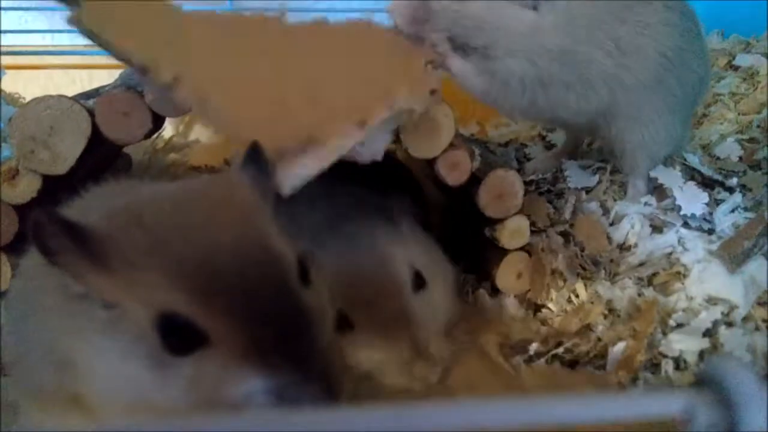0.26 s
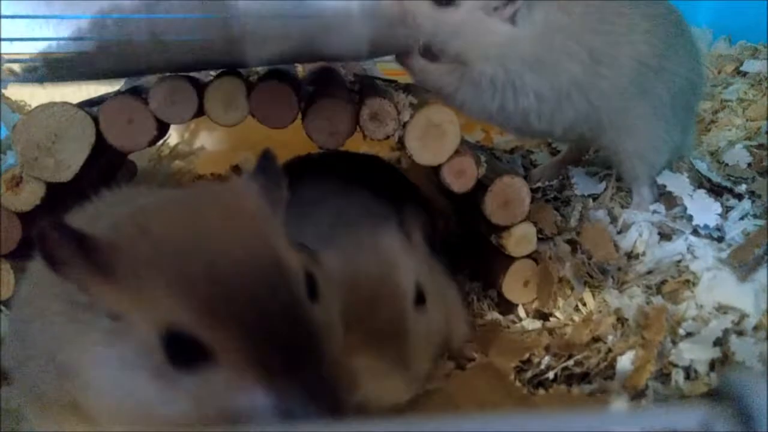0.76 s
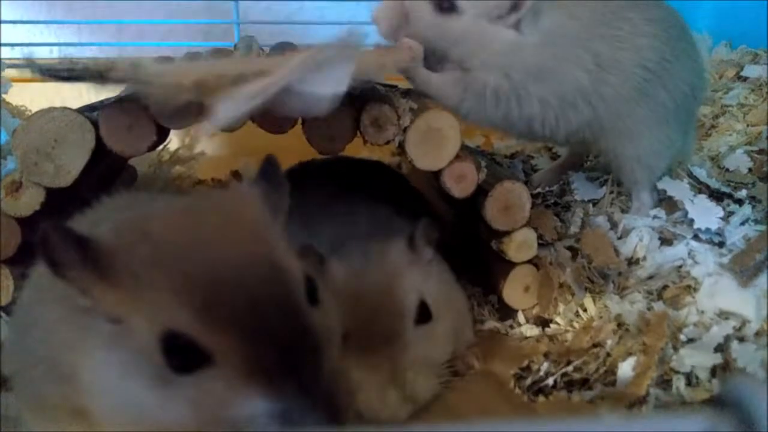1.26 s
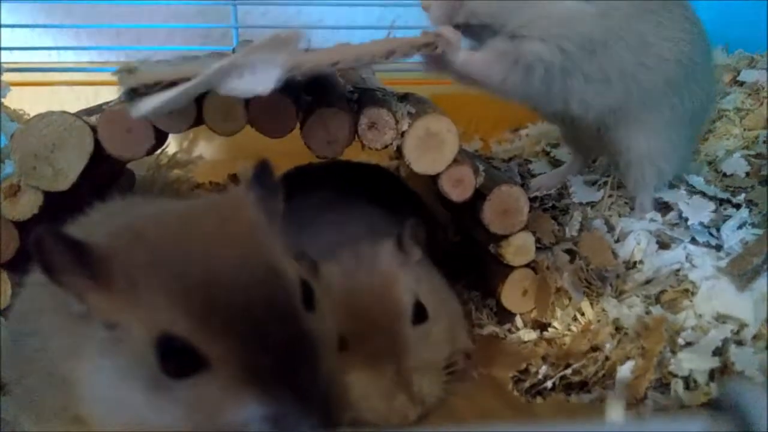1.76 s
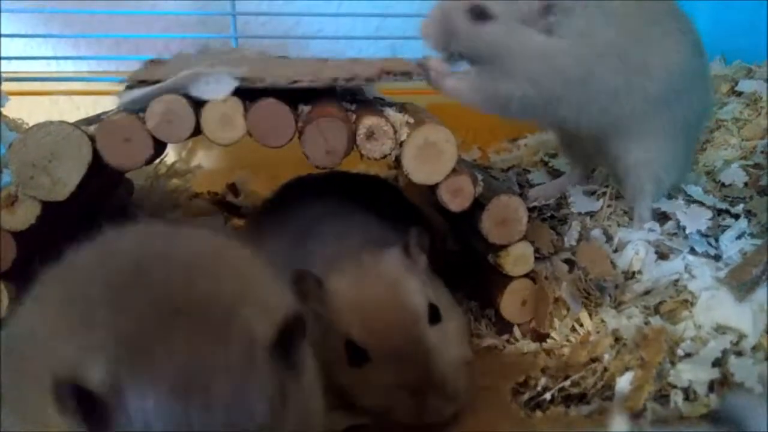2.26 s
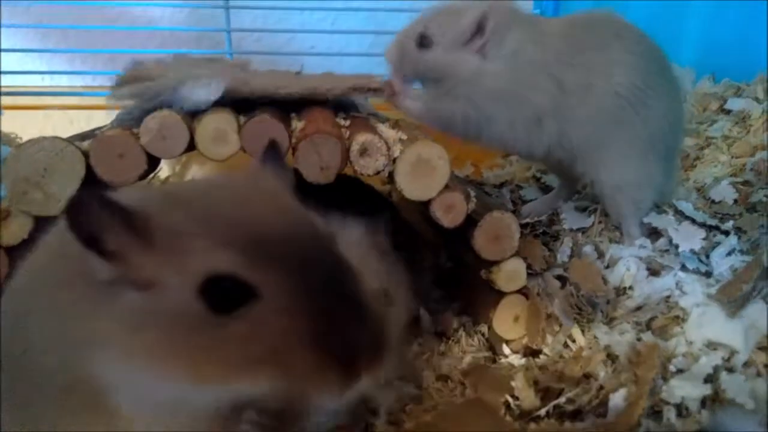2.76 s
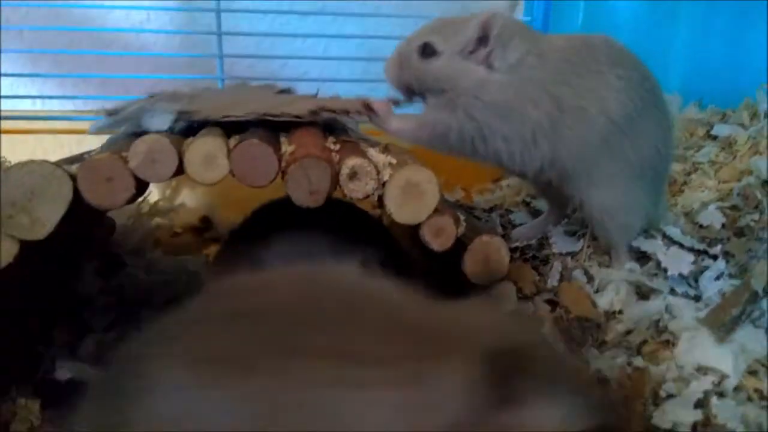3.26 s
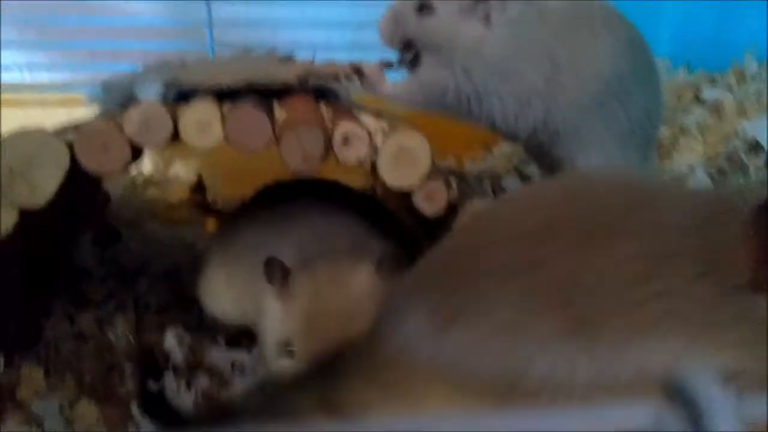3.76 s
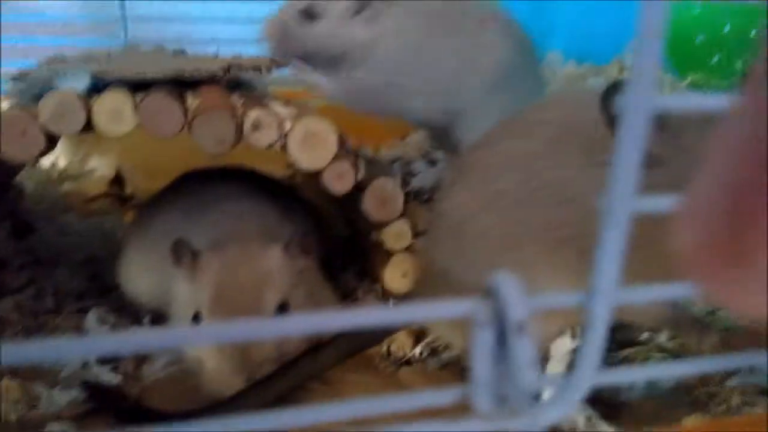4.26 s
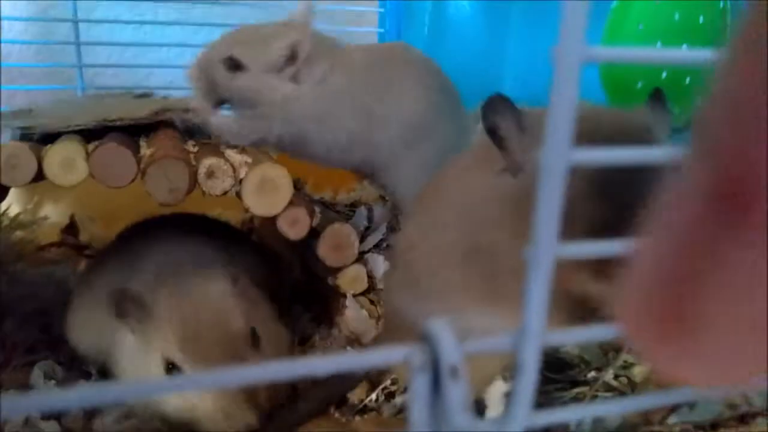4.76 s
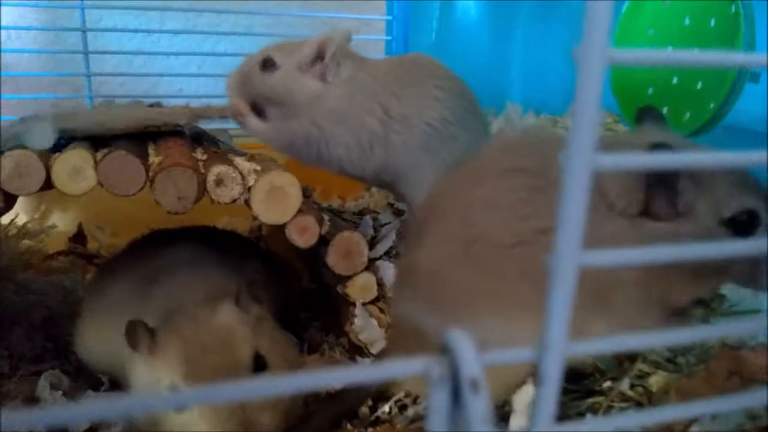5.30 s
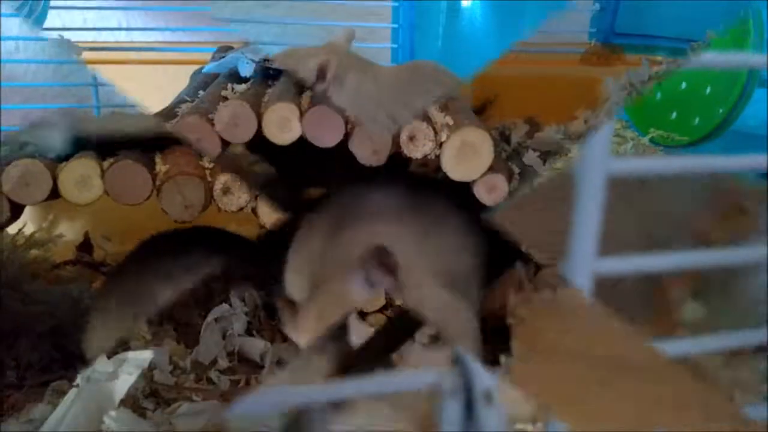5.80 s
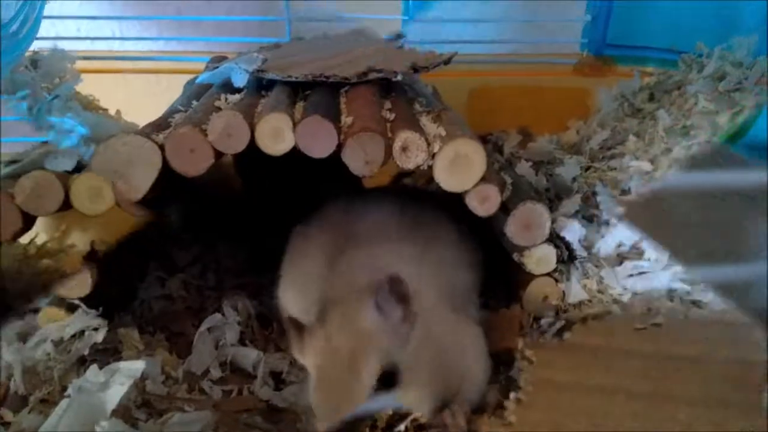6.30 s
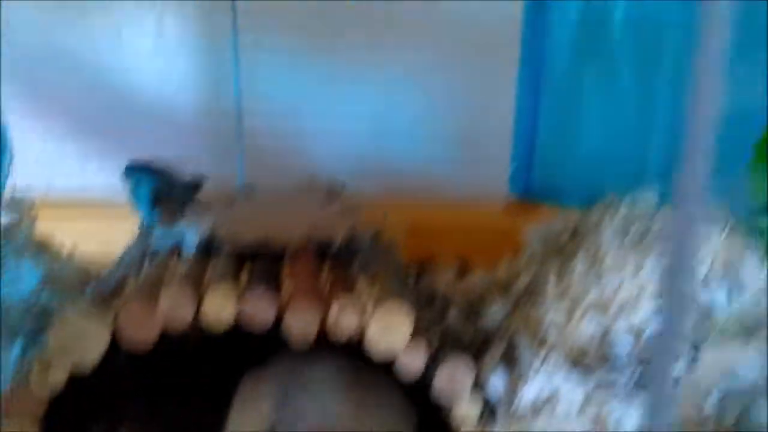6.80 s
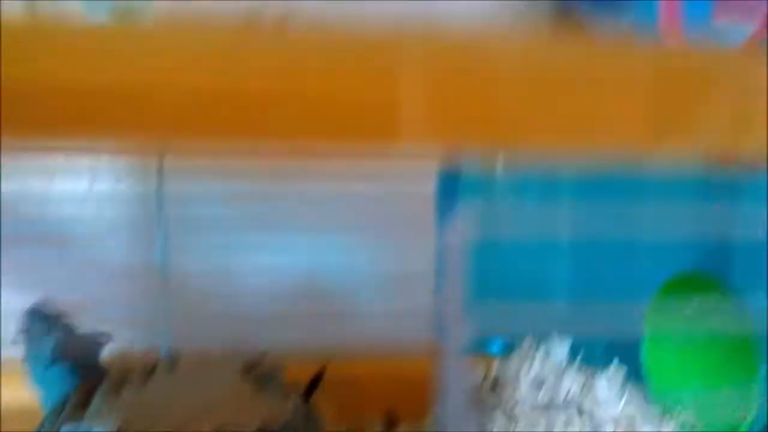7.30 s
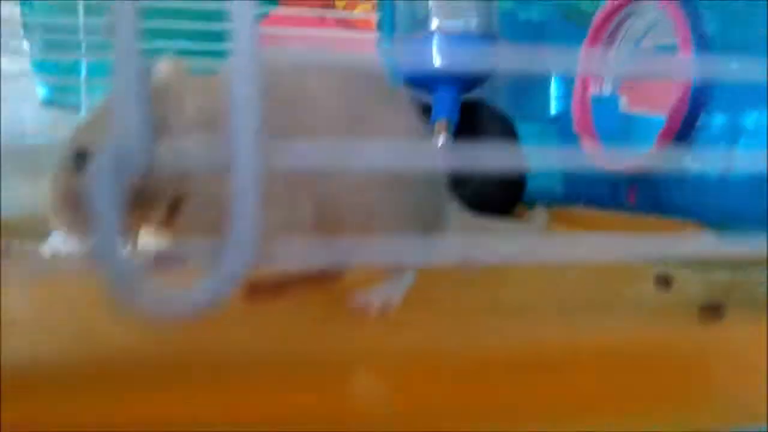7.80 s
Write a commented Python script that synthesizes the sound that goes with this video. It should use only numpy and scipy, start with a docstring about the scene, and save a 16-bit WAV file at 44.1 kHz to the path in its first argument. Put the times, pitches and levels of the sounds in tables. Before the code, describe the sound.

Close, dry stereo sound of small rodents tearing paper and card. Quick tooth snaps and fibrous crackles come in uneven bursts, with dull board scrapes and tiny hollow wooden knocks beneath. A cluster of loud cracks mid-way gives way to sparser nibbling, then the heaviest bites arrive late and stop, leaving faint hiss and low hum.

```python
"""Gerbils shred cardboard and paper in a small cage, heard close by at two microphones.
Teeth bite in short bursts of snaps; fibres crackle in clumps as strips tear and bedding stirs.
Random clicks, shaped in level and filtered, give both a bright crackle and a duller board sound.
Board knocks and crunches ring a wooden arch, summed from decaying sines; one low bump joins them.
Filtered noise hiss, a wavering low hum and thin steady whine tones run beneath."""
import sys
import numpy as np
from scipy import signal
from scipy.io import wavfile
from scipy.ndimage import uniform_filter1d, minimum_filter1d

SR = 44100
rng = np.random.default_rng(int(sys.argv[2]) if len(sys.argv) > 2 else 0)


def dump(signal):
    """Clip the signal to [-1, 1] and save it as 16-bit WAV at the path in sys.argv[1]."""
    limited = np.clip(np.atleast_2d(signal).T, -1, 1)
    pcm = np.round(limited * 32767).astype(np.int16)
    wavfile.write(sys.argv[1], SR, pcm)


N = 355005

# Levels are nominal, ahead of the mix gains in scene().
# teeth breaking through: t of break/s, crackle level/dB, board re crackle/dB
BITES = [(0.098, -19, -23), (0.276, -33, -32), (0.308, -17, -13.5), (0.764, -29.5, -36), (0.882, -24, -32),
         (1.0145, -22.5, -40), (1.097, -32, -38), (1.1681, -17.5, -17), (1.237, -29, -32),
         (1.2948, -19.5, -24), (1.435, -35, -23), (1.454, -19.5, -37), (1.663, -19.5, -12.5),
         (1.7979, -19.5, -19), (1.8254, -21.5, -18), (1.9389, -27.5, -18), (2.1256, -13.5, -14.5),
         (2.3591, -21, -21.5), (2.495, -30, -21), (2.5411, -12, -3), (2.555, -8, -23.5), (2.728, -15, -15),
         (2.797, -28, -20), (2.879, -32.5, -9), (3.0056, -29.5, -13), (3.1946, -23, -34),
         (3.223, -33.5, -34), (3.305, -29, -25), (3.453, -34, -26), (3.621, -29.5, -7),
         (3.9484, -29.5, -43), (4.0724, -16, -11), (4.1081, -15, -12), (4.2918, -34, 1.5),
         (4.501, -26, -13), (4.5349, -20, -16), (4.845, -21, -45), (4.9336, -19, -16.5),
         (5.1443, -20.5, -10.5), (5.374, -30, -29), (5.41, -26, -13.5), (5.4586, -20, -20),
         (5.498, -22.5, -16), (5.557, -26.5, -11.5), (5.592, -21, -16), (5.6442, -16.5, -8),
         (5.718, -22, -22), (5.8396, -6, -9.5), (5.918, -10.5, -18.5), (6.1255, -19.5, -9.5),
         (6.2983, -11.5, -5), (6.5157, -17, -20), (6.549, -15, -27), (6.5641, -16.5, -32),
         (6.7586, -13, -21.5), (6.9025, -13.5, -14.5)]
# strips torn off: t/s, length/s, crackle level at start/dB, change along strip/dB, board re crackle/dB
TEARS = [(0.029, 0.074, -53.5, 21.5, -11), (0.086, 0.1, -24.5, -17.5, -22.5), (0.231, 0.021, -34, -15, -8),
         (0.277, 0.069, -24.5, -8.5, -19.5), (0.516, 0.096, -37, 1.5, -10), (0.646, 0.026, -48, 4, -7),
         (0.89, 0.034, -35.5, -12, -20.5), (0.943, 0.21, -33, -13.5, -16.5),
         (1.164, 0.1, -26.5, -23, -13.5), (1.322, 0.073, -37.5, -5.5, -12.5),
         (1.434, 0.034, -42, 6.5, -10.5), (1.565, 0.098, -37.5, -1.5, -10), (1.798, 0.092, -37.5, -8, -16),
         (2.079, 0.04, -36.5, -17, -21), (2.112, 0.1, -32.5, 0, -13.5), (2.321, 0.035, -47.5, 21, -15.5),
         (2.668, 0.024, -38.5, 12.5, -15), (2.729, 0.074, -27.5, -13, -11.5),
         (3.006, 0.037, -37, -14.5, -17.5), (3.161, 0.094, -39.5, -7.5, -19.5), (3.43, 0.3, -48, 3, -9.5),
         (3.568, 0.13, -42, 12, -19), (4.043, 0.1, -42, 8, -11.5), (4.132, 0.095, -47.5, -1.5, -5.5),
         (4.431, 0.086, -52, -4.5, -8), (4.495, 0.22, -37.5, -12, -7), (4.59, 0.087, -33.5, 7, -11.5),
         (4.739, 0.05, -44.5, 1, -0.5), (4.876, 0.091, -40, -4.5, -5.5), (4.967, 0.035, -32, 3.5, -14),
         (5.102, 0.095, -44.5, 4.5, -9.5), (5.24, 0.055, -48.5, 25.5, -13), (5.357, 0.15, -52, 14, -4.5),
         (5.453, 0.023, -29, -0.5, -15.5), (5.674, 0.059, -44, 11.5, -24), (5.775, 0.073, -46.5, 23, -7.5),
         (5.833, 0.19, -24, -21, -14), (6.058, 0.051, -36.5, 8.5, -13), (6.273, 0.065, -32, 3, -11),
         (6.459, 0.12, -44.5, 14.5, -11), (6.619, 0.029, -29.5, -2.5, -21),
         (6.716, 0.082, -28, -11.5, -11.5), (6.818, 0.08, -48.5, 25.5, -7.5), (6.879, 0.077, -33, -3.5, -3),
         (6.982, 0.21, -44, -2.5, -22.5)]
# bedding rustling under the animals: t/s, crackle level/dB
BEDDING_RUSTLE = [(0.0, -63), (0.3, -43.5), (0.72, -56.5), (1.53, -54.5), (1.75, -45.5), (2.04, -55.5),
                  (2.6, -44.5), (2.95, -54.5), (3.1, -66), (3.35, -52.5), (3.8, -45.5), (4.2, -51),
                  (4.37, -70.5), (4.8, -43.5), (6.2, -45.5), (6.93, -40.5), (7.02, -57), (7.24, -63.5),
                  (7.34, -92)]
# spectrum of snapping fibres: f/Hz, relative density/dB per Hz
CRACKLE_SPECTRUM = [(3000, -39.5), (5500, -24), (6500, -22.5), (8000, -14), (11000, -9), (12500, -5.5),
                    (14600, -2.5), (15500, -1.5), (15900, -39.5), (16700, -34)]
# spectrum of the board: f/Hz, relative density/dB per Hz
BOARD_SPECTRUM = [(60, -71), (150, -23), (370, -9), (650, -8.5), (1100, -4), (1800, -6.5), (3000, -6.5),
                  (5000, -14), (7000, -10), (10000, -47)]
# board knocking on wood: t/s, blow level/dB, nominal board pitch f/Hz, rattle length/s
KNOCKS = [(0.527, -43, 547, 0.021), (0.593, -37.5, 350, 0.035), (0.664, -39, 360, 0.044),
          (0.801, -41.5, 355, 0.043), (0.936, -41, 360, 0.062), (1.165, -37.5, 460, 0.021),
          (1.235, -43.5, 378, 0.01), (1.250, -40.5, 388, 0.031), (1.341, -37, 350, 0.014),
          (1.366, -39.5, 370, 0.014), (1.388, -42, 370, 0.01), (1.404, -46, 360, 0.0083),
          (1.415, -42.5, 347, 0.03), (1.463, -40, 382, 0.0072), (1.473, -40.5, 405, 0.022),
          (1.661, -40, 396, 0.025), (1.896, -31, 390, 0.037), (2.542, -33.5, 462, 0.032),
          (2.727, -28, 355, 0.014), (2.879, -43, 410, 0.03), (3.269, -42.5, 246, 0.046),
          (3.833, -41, 254, 0.034), (4.068, -49, 270, 0.035), (4.292, -42, 490, 0.032),
          (4.612, -50, 376, 0.0216), (4.747, -46, 393, 0.016), (4.776, -46, 390, 0.052),
          (4.879, -46, 460, 0.023), (5.192, -43.5, 378, 0.02), (5.366, -44.5, 476, 0.011),
          (5.641, -38, 556, 0.015), (5.839, -36.5, 375, 0.023), (5.915, -35.5, 392, 0.026),
          (6.294, -42, 487, 0.024), (6.558, -40, 402, 0.05), (6.723, -43, 464, 0.041),
          (6.891, -37, 517, 0.033), (7.12, -62, 400, 0.044)]
# teeth crunching through to the wood: t/s, level/dB
CRUNCHES = [(0.296, -35.5), (0.529, -32), (0.595, -32), (1.798, -39), (2.126, -32), (2.354, -41.5),
            (2.542, -24.5), (2.554, -23), (2.727, -17.5), (2.734, -22), (3.635, -31), (4.072, -32),
            (4.106, -29), (4.523, -36), (4.552, -36), (4.636, -34), (4.649, -34.5), (4.75, -37),
            (4.934, -36), (5.142, -48), (5.296, -27.5), (5.458, -42), (5.643, -14.5), (5.786, -42),
            (5.838, -22.5), (5.916, -27), (6.093, -34.5), (6.279, -31), (6.298, -26), (6.512, -33.5),
            (6.878, -28.5), (6.901, -26.5)]
# nominal modes of the wooden arch: f/Hz, level/dB, t60/s
ARCH_MODES = [(740, -8, 0.013), (1100, -3, 0.013), (1550, -5, 0.009), (2250, -5, 0.007)]
# one low bump through the cage floor: t/s, level/dB, f/Hz, length/s
FLOOR_BUMP = (5.85, -55, 96, .075)
# where the busiest animal is: t/s, left re right level/dB
PLACE = [(0, -3.5), (1, 1), (2.2, -0.5), (3.2, 1.5), (3.7, -1.5), (4.7, 3.5), (6.2, -1.5), (7.2, -0.5)]
# whine tones: multiple of WHINE_BASE_HZ, rms level/dB
WHINE_TONES = [(4, -100), (5, -101), (6, -99.5)]
# spectrum of the hiss: f/Hz, relative density/dB per Hz
HISS_SPECTRUM = [(20, -6), (65, 0), (130, -9), (280, -14), (500, -26), (1000, -29), (13500, -31),
                 (14500, -20), (15200, -32), (15800, -50)]

BITE_T60_S, RISE_T60_S = 0.016, 0.0072  # decay after the break, rise before it
BREAK_DB, BREAK_T60_S = 3, 0.0035  # sharp crack at the break, re burst
GRIP_DB_PER_S, LET_GO_DB_PER_S = 1508, 796  # onset and stop of a tear
RUSTLE_BOARD_DB = -15  # re crackle
KNOCK_ARCH_DB = -8.5  # arch ring in a knock
THUD_T60_S, RISE_S = 0.015, 0.0012
LEFT_LAG_SAMPLES = 9  # about the mean; the animals are nearer the right microphone
HUM_HZ, HUM_DB = 99, -73.5  # centre of the wavering
WHINE_BASE_HZ, HISS_DB = 2305, -82
BAND_EDGE_HZ = 16800


def bites():
    """Each bite is a burst of snaps that rises quickly to its break, then dies."""
    lead, length = 400, 5000  # samples before the break, samples in all
    t = (np.arange(length) - lead) / SR
    flutter = gain_of(2.5 * drift(0.001))  # random, roughens each burst
    fibres = flutter * np.array([snaps(13000, spread_db=-1.0), snaps(6000, spread_db=3.5)])
    rise_and_decay = gain_of(-60 * np.where(t < 0, -t / RISE_T60_S, t / BITE_T60_S))
    crack = gain_of(-60 * abs(t) / BREAK_T60_S)
    shape = rise_and_decay / gain_of(BREAK_DB) + crack
    out = np.zeros((2, N))  # crackle drive, board drive
    for s, db, board_db in BITES:
        at = round(s * SR) - lead
        burst = shape * fibres[:, at:at + length]
        # jaw force sets the energy, whatever the random snaps
        burst *= np.linalg.norm(shape) / np.linalg.norm(burst, axis=1, keepdims=True)
        out[:, at:at + length] += burst * gain_of([[db], [db + board_db]])
    return out


def tearing():
    """Fibres snap in clumps as strips tear or bedding stirs; returns crackle and board drives."""
    t = np.arange(0, N + 32, 32) / SR
    power = gain_of(2 * np.interp(t, *np.transpose(BEDDING_RUSTLE)))
    board_power = power * gain_of(2 * RUSTLE_BOARD_DB)
    for s, length, db, change_db, board_db in TEARS:
        along = change_db * np.clip((t - s) / length, 0, 1)
        onset = GRIP_DB_PER_S * np.minimum(t - s, 0)
        stop = -LET_GO_DB_PER_S * np.maximum(t - s - length, 0)
        strip = gain_of(2 * (db + along + onset + stop))
        power = power + strip
        board_power = board_power + strip * gain_of(2 * board_db)
    time = np.arange(N) / SR
    level = np.sqrt(np.interp(time, t, power))
    board_level = np.sqrt(np.interp(time, t, board_power))

    clumps = evened(gain_of(2.2 * drift(0.002) + 2.4 * drift(0.006)))
    # sparse larger ticks at random among the crackle
    ticks = uniform_filter1d(abs(snaps(60, spread_db=2.5)), size=60) * np.sqrt(60)
    clumps = clumps + gain_of(-7) * ticks
    crackle = clumps * level * snaps(5000, spread_db=0.0)
    board = clumps * board_level * snaps(700, spread_db=2.0) * gain_of(1.6 * drift(0.0053))
    return crackle, board


def snaps(per_s, spread_db):
    """Random-sign clicks at rms 1; exponential dB sizes, positive spread favours few large ones."""
    size = gain_of(spread_db * np.minimum(rng.exponential(1, N), 4))
    struck = rng.random(N) < per_s / SR
    return evened(size * struck * rng.choice([-1., 1.], N))


def board_colour(x, depth_db):
    """Board colour wanders at random, in patches of some 50 ms by 700 Hz."""
    bins = signal.stft(x, nperseg=512)[2]
    patches = rng.standard_normal(bins.shape[1:])
    for axis in (0, 1):
        patches = uniform_filter1d(patches, size=8, axis=axis)
    colour = evened(gain_of(depth_db * evened(patches)))
    return signal.istft(bins * colour, nperseg=512)[1][:, :N]


def knocks():
    """The board thuds near its own pitch, rings the arch and rattles on in uneven bounces."""
    out, t = np.zeros(N), np.arange(2000) / SR
    rise = 1 - np.exp(-(t / RISE_S) ** 2)
    chances = rng.random((len(KNOCKS), 4, 7))
    for (s, db, board_hz, rattle_s), chance in zip(KNOCKS, chances):
        ring = gain_of(KNOCK_ARCH_DB) * arch(t, chance[0])
        # the blow and six weaker bounces, as shares of the rattle
        delays = np.append(0, (np.arange(6) + chance[1, 1:]) / 6)
        for share, weaker, bend in zip(delays, chance[2], chance[3]):
            hz = board_hz * (0.88 + 0.2 * bend)
            thud = gain_of(-60 * t / THUD_T60_S) * np.sin(2 * np.pi * hz * t)
            loss_db = (share > 0) * (1.5 + 16 * weaker + 5.3 * share)
            at = round((s + share * rattle_s) * SR)
            out[at:at + 2000] += gain_of(db - loss_db) * rise * (thud + ring)
    return out


def crunches():
    """Hard crunches ring the arch alone; some fall together with a knock."""
    out, t = np.zeros(N), np.arange(2000) / SR
    rise = np.sqrt(1 - np.exp(-(t / RISE_S) ** 2))
    for (s, db), chance in zip(CRUNCHES, rng.random((len(CRUNCHES), 4))):
        at = round(s * SR)
        out[at:at + 2000] += gain_of(db) * rise * arch(t, chance)
    return out


def arch(t, chance):
    """Decaying arch modes, each pitch a little different at each strike."""
    ring = 0
    for (hz, db, t60), k in zip(ARCH_MODES, chance):
        ring = ring + gain_of(db - 60 * t / t60) * np.sin(2 * np.pi * hz * (0.93 + 0.14 * k) * t)
    return ring


def floor_bump():
    """A low sine under a smooth hump: the bump through the cage floor."""
    s, db, hz, length = FLOOR_BUMP
    t = np.arange(N) / SR - s
    hump = np.sin(np.pi * np.clip(t / length, 0, 1)) ** 2
    return gain_of(db) * np.sin(2 * np.pi * hz * t) * hump


def wood_sound():
    """Knocks and crunches lose bass, as a small board moves little air there; the bump keeps it."""
    highpass = signal.butter(2, 170, "high", fs=SR)
    return signal.lfilter(*highpass, knocks() + crunches()) + floor_bump()


def cage(x, wet_db, t60, stay_s, count=12):
    """Sound hops between spots, each with its own paths to the microphones and reflections."""
    length = 2500
    t, stay, out = np.arange(length) / SR, round(stay_s * SR), 0
    spot = rng.integers(0, count, N)[np.arange(N) // stay]
    for k in range(count):
        sparse = rng.random((2, length)) < 0.2
        taps = rng.standard_normal((2, length)) * sparse * gain_of(-60 * t / t60)
        taps *= gain_of(wet_db) / np.linalg.norm(taps, axis=1, keepdims=True)
        # direct sound, later on the left
        taps[0, LEFT_LAG_SAMPLES + rng.integers(-5, 6)] += 1
        taps[1, 0] += 1
        taps /= np.linalg.norm(taps, axis=1, keepdims=True)
        out = out + signal.oaconvolve((x * (spot == k))[None], taps, axes=1)[:, :N]
    return out


def background():
    """Hiss largely common to both sides, a slightly wavering hum and thin steady whine tones."""
    t = np.arange(N) / SR
    a, b = rng.standard_normal((2, N))
    hiss = coloured(np.array([a + 0.13 * b, a - 0.18 * b]), HISS_SPECTRUM, size=8192)
    hum_level = gain_of(HUM_DB + 1.8 * drift(0.03))
    hum_phase = 2 * np.pi * np.cumsum(HUM_HZ + 1.2 * drift(0.05)) / SR
    hum = hum_level * np.sqrt(2) * np.sin(hum_phase)
    whine = np.zeros(N)
    for multiple, db in WHINE_TONES:
        whine += gain_of(db) * np.sqrt(2) * np.sin(2 * np.pi * multiple * WHINE_BASE_HZ * t)
    return gain_of(HISS_DB) * evened(hiss) + hum + whine


def gain_of(db):
    """Amplitude factor of a level in dB."""
    return 10 ** (np.asarray(db) / 20)


def evened(x):
    """Scale to rms 1."""
    return x / np.sqrt(np.mean(x ** 2) + 1e-20)


def drift(seconds):
    """Twice-averaged noise: slow random motion of rms 1."""
    size = max(round(seconds * SR), 2)
    return evened(uniform_filter1d(uniform_filter1d(rng.standard_normal(N), size), size))


def coloured(x, points, size=2048):
    """Causal minimum-phase filter of unit energy with the given spectrum."""
    hz, db = np.transpose(points)
    bins_hz = abs(np.fft.fftfreq(size, 1 / SR))
    level_db = np.interp(np.log(bins_hz + 1), np.log(hz + 1), np.maximum(db, -100))
    log_gain = level_db * np.log(10) / 20
    # the Hilbert transform of the log gain gives the phase
    taps = np.fft.ifft(np.exp(np.conj(signal.hilbert(log_gain)))).real[:size // 2]
    return signal.oaconvolve(x, taps[None] / np.linalg.norm(taps), axes=1)[:, :N]


def scene():
    """Place crackle, board and wood in the cage, balance left and right, add the background."""
    torn, torn_board = tearing()
    bitten, bitten_board = bites()
    crackle = cage(torn + bitten, wet_db=-5.0, t60=0.043, stay_s=0.0048)
    crackle = coloured(crackle, CRACKLE_SPECTRUM)
    board = cage(torn_board + bitten_board, wet_db=1, t60=0.057, stay_s=0.012, count=8)
    board = board_colour(coloured(board, BOARD_SPECTRUM), depth_db=3.5)
    wood = cage(wood_sound(), wet_db=-13, t60=0.03, stay_s=0.1, count=4)
    animals = gain_of(4.5) * crackle + board + gain_of(9.5) * wood
    side_db = np.interp(np.arange(N) / SR, *np.transpose(PLACE))
    return animals * gain_of(np.array([side_db / 2, -side_db / 2])) + background()


def record(dry):
    """A quick limiter holds peaks just below full scale; then the band limit."""
    room_left = np.minimum(0.98 / (abs(dry) + 1e-9), 1)
    limiter_gain = uniform_filter1d(minimum_filter1d(room_left, size=41), size=41)
    lowpass = signal.firwin(255, BAND_EDGE_HZ, window=("kaiser", 9), fs=SR)
    return signal.oaconvolve(dry * limiter_gain, lowpass[None], "same")


dry = scene()
out = record(dry)
dump(out)
```